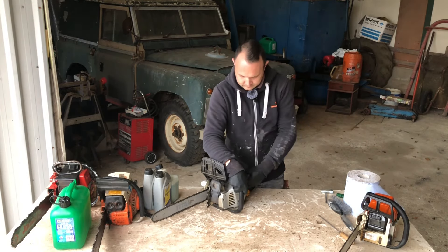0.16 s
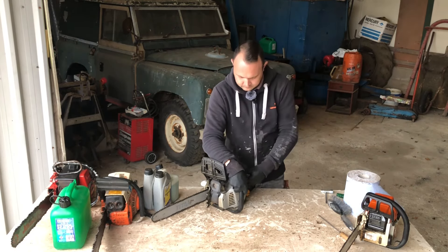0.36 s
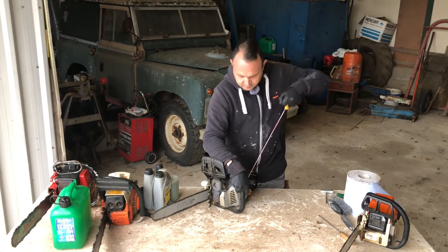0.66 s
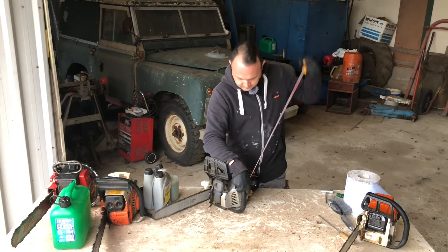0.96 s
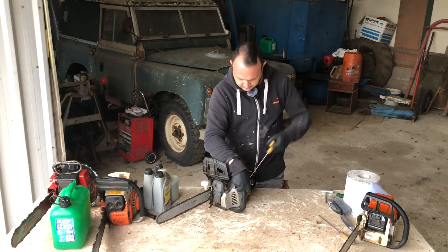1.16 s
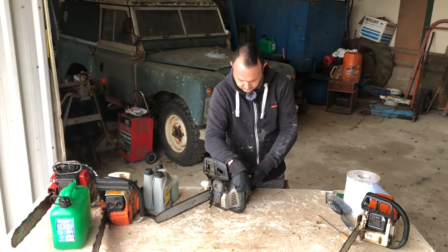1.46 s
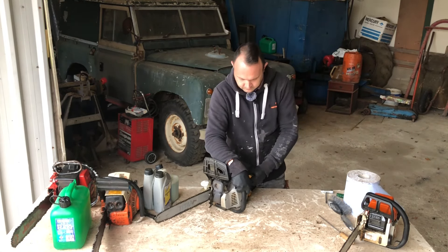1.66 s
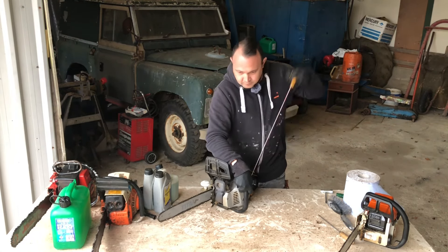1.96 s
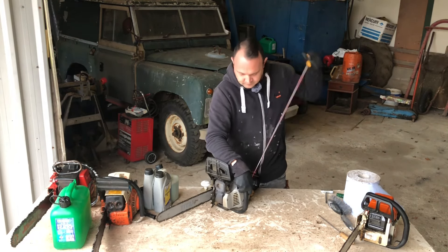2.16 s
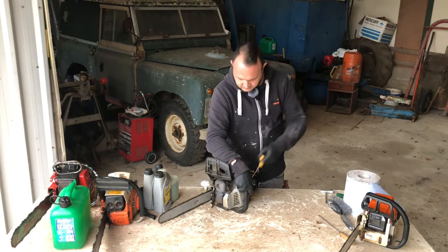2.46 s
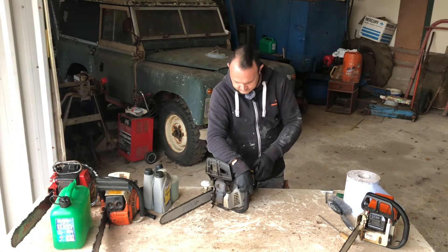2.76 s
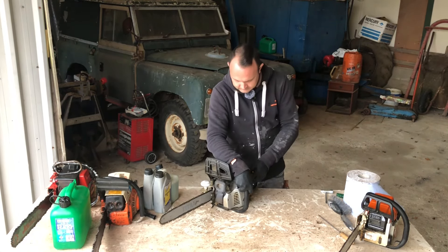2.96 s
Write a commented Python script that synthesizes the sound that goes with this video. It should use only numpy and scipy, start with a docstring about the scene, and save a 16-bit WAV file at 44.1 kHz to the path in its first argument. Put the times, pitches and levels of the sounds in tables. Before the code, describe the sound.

A small chainsaw's starter cord is pulled twice with rasping whirrs, but the cold engine never catches.

```python
"""A cold two-stroke chainsaw is pull-started on a wooden bench in a garage and does not catch: sparse random
impulses through bench resonances make the judder, low sine pushes the bumps, and filtered slips the cord's rasp.
Noise bursts make cord snaps, damped modes the ticking, clunking pawls, and ringing bands the chain's clash on its bar.
The spring then winds the cord back in noisy scrapes until the handle smacks the housing, all over room tone and hum.
The scene opens on the end of one rewind; two whole pulls follow."""
import sys
import numpy as np
from scipy import signal
from scipy.fft import rfft, irfft, next_fast_len
from scipy.io import wavfile
from scipy.ndimage import uniform_filter1d, map_coordinates

SR = 44100
rng = np.random.default_rng(int(sys.argv[2]) if len(sys.argv) > 2 else 0)


def materialize(psi):
    """Save the field psi as 16-bit PCM at rate SR to the path in sys.argv[1].

    A 1-D psi becomes a single channel; in a 2-D psi each row is a channel.
    """
    bounded = np.clip(np.atleast_2d(psi).T, -1, 1)
    quanta = np.round(bounded * 32767).astype(np.int16)
    wavfile.write(sys.argv[1], SR, quanta)


N = 136710

# Levels in the tables are relative: the sources add their own trims.
# judder of the cranking engine, one curve a pull: start_s, level_db
CRANK_CURVES = [
    [(0.64, -58), (0.718, -27.5), (0.78, -43.5), (0.822, -14), (1.086, -20), (1.4, -55)],
    [(1.88, -40.5), (1.978, -37), (2.004, -31.5), (2.066, -10), (2.202, -16), (2.62, -49)],
]
# running cord and pulley, one curve a run: start_s, whirr_db, rasp_db, hiss_db
CORD_CURVES = [
    [(0.0, -27.5, -36, -43.5), (0.048, -28, -44.5, -52), (0.056, -37, -44, -51), (0.068, -28.5, -41.5, -53),
     (0.078, -39.5, -45, -64), (0.125, -35.5, -47, -72.5)],
    [(0.67, -19, -81, -101.5), (0.774, -28, -41.5, -51.5), (0.834, -15.5, -35.5, -52.5),
     (1.092, -20, -33, -36.5), (1.328, -28, -46, -72), (1.41, -28.5, -42.5, -52)],
    [(1.91, -21.5, -38.5, -92.5), (2.022, -19.5, -49.5, -59.5), (2.058, -16, -41, -71),
     (2.194, -20, -34.5, -44), (2.588, -33.5, -44.5, -55.5), (2.64, -42.5, -48.5, -76)],
]
# the saw bumps the bench: start_s, level_db
BENCH_BUMPS = [(0.69, -17.5), (0.719, -10.5), (0.817, -1), (0.83, -3), (0.85, -1.5), (0.879, 5),
               (0.911, -5), (0.931, -14.5), (0.955, -5.5), (1.004, -12), (1.052, -2.5), (1.076, -7.5),
               (1.945, -5), (1.978, -5), (2.063, -13), (2.081, 0), (2.109, 0.5), (2.123, -2.5), (2.139, -5),
               (2.172, -0.5), (2.201, -17), (2.223, -3.5), (2.247, -11), (2.28, -11)]
# dry snaps of the cord under load: start_s, level_db, pitch_hz
CORD_SNAPS = [(0.6833, 0, 4000), (0.6908, -6, 4330), (0.7138, -7, 4450), (0.7161, -3.5, 6700),
              (0.7224, -0.5, 6900), (0.7273, -2, 4170), (0.8026, -4.5, 3870), (0.8227, -11, 6770),
              (0.8368, -11.5, 4290), (0.965, -3, 6560), (0.9815, -8.5, 6100), (1.898, -17.5, 4400),
              (1.9275, -1.5, 5050), (1.945, -2, 4080), (1.9771, -2.5, 6700), (1.9831, -3, 6900),
              (1.9858, -11, 4370), (2.0229, -10.5, 4430), (2.0674, -1, 6700), (2.1881, -7, 4450),
              (2.2076, -4.5, 3960), (2.2144, -0.5, 6800), (2.2304, -11, 4250), (2.2429, -3.5, 4420)]
# scrapes of the rewinding pulley: start_s, scrape_db, hiss_db
PULLEY_SCRAPES = [(0.017, -22.5, -35.5), (0.04, -10, -50), (0.065, -14.5, -37.5), (0.103, -17.5, -38.5),
                  (0.163, -16, -46.5), (1.04, -14, -44.5), (1.079, -10, -29.5), (1.105, -13.5, -29),
                  (1.185, -30, -34.5), (1.219, -11.5, -34), (1.241, -6, -35), (1.264, -10.5, -36),
                  (1.285, -23.5, -35), (1.311, -11.5, -39), (1.34, -14, -44), (1.374, -18, -51),
                  (2.289, -2.5, -32), (2.339, -7.5, -30.5), (2.349, -10.5, -45.5), (2.363, -15, -30.5),
                  (2.375, -8, -27.5), (2.4, -8, -35), (2.42, -10.5, -48), (2.458, -19.5, -41),
                  (2.501, -20.5, -71), (2.545, -16, -56), (2.572, -10, -53), (2.605, -12.5, -44.5),
                  (2.643, -12, -41)]
# the pawls flick out: start_s, level_db
PAWL_TICKS = [(0.612, -17), (1.849, -16)]
# the pawls seat and the starter knocks: start_s, level_db, hardness_db
PAWL_CLUNKS = [(0.636, -19, 11.5), (0.644, -21, 11), (0.753, -24, -9), (1.868, -9.5, -4.5),
               (1.882, -20.5, -4), (2.049, -10, -19.5)]
# the chain clashes on the bar: start_s, level_db, ring_db
CHAIN_CLASHES = [(0.881, -9.5, -16), (2.112, -12, -15.5)]
# the handle hits the housing, each spot with two rings: start_s, level_db, low_hz, low_db, high_hz, high_db
HANDLE_SMACKS = [(0.137, -8.5, 494.4, 2.5, 1153, -4), (1.430, -6, 513, -4, 814, 2.5),
                 (2.659, 11, 460.6, -0.5, 1034, 5.5)]
REBOUND_S, REBOUND_DB = 0.006, 2  # the second end of the handle lands later and louder

# damped modes, before any event envelope: pitch_hz, level_db, t60_s
HOUSING_MODES = [(454, -24.5, 0.36), (824, -10.5, 0.056), (1007, -24, 0.31), (1230, -15.5, 0.06),
                 (1428, -11, 0.04), (1920, -14, 0.015)]
PAWL_MODES = [(1680, -1.5, 0.0099), (1880, 4, 0.0099), (4070, -2, 0.014), (4050, 3, 0.021),
              (4740, -1, .009), (5200, -10.5, .008), (7100, -26.5, .04), (10880, -10, 0.0089)]
STARTER_MODES = [(550, 2, 0.089), (450, -9.5, 0.03), (684, -10.5, 0.076), (994, -9.5, 0.076),
                 (2370, -20.5, .06), (3230, -22.5, 0.13)]

# resonances of chain, bench, plastic shell and pulley: centre_hz, width_hz, level_db
CHAIN_BODY = [(2935, 43, 6.5), (4280, 260, -6), (5170, 130, -6), (5640, 150, -6.5), (6700, 210, 0),
              (7100, 400, -11), (8300, 300, -10.5), (13700, 670, -18)]
BENCH_BODY = [(32, 28, -3), (63, 22, -4.5), (129, 34, 3.5), (239, 88, -2.5), (314.6, 58, -2.5)]
SHELL_BODY = [(439, 49, 6), (554.5, 40, 8.5), (782, 130, 0.5), (969, 82, 3.5), (1180, 290, -3),
              (1546, 330, -5), (2500, 580, -13)]
PULLEY_BODY = [(3100, 200, -2), (3840, 170, 0.86), (6340, 210, 0), (7400, 460, -3.2)]

# noise colours of the sources and the room tone: frequency_hz, relative_db
RASP_COLOUR = [(900, -17.5), (1800, -43.5), (2500, 4.5), (3150, 10), (4000, 5.5), (4700, 0.5), (6700, 2.5),
               (8000, -15.5), (10000, -20), (15000, -47)]
HISS_COLOUR = [(3000, -20.5), (6000, -5.5), (8600, -1), (9800, -6), (12000, -1.5), (14000, 1.5),
               (15800, -5)]
SNAP_COLOUR = [(100, 7), (900, -6), (2100, 8), (3000, -6.5), (4300, 3.5), (5600, -9.5), (7000, 0),
               (7800, -5), (8600, 5), (9700, -7), (14500, -8), (16000, -22.5)]
SCRAPE_COLOUR = [(200, -6.5), (380, -7.5), (520, 9), (680, 3.5), (1000, 5), (1900, -13), (3000, -10),
                 (4000, -23.5), (4800, -24.5), (7000, -25), (10000, -44.5)]
SMACK_COLOUR = [(60, -40.5), (250, -8.5), (400, -3.5), (520, 1), (660, 5.5), (1000, 8), (1500, -4.5),
                (3600, -11), (5500, -20.5), (9000, -28), (14000, -34), (16000, -42.5)]
CLASH_COLOUR = [(500, -16), (2000, -11.5), (3200, 3.5), (5000, 1), (6500, 2), (8500, -9.5), (10000, -20),
                (14000, -7), (16000, -22.5)]
AIR_COLOUR = [(25, -1), (60, -5.5), (90, -1), (140, -4), (220, -15.5), (550, -16.5), (1500, -34),
              (2800, -32), (5000, -39.5), (16000, -48)]
KNOCK_COLOUR = [(25, -7.5), (250, 4.0), (550, 3.0), (700, -10), (1100, -2.5), (2500, -47.5), (8000, -73.0)]
CLICK_COLOUR = [(1000, -27.5), (1850, 7), (2900, -20), (4100, 4.0), (5100, 0.5), (6000, -23), (14000, -22.5)]
RATTLE_COLOUR = [(200, -25.5), (600, 4.0), (2200, -7.5), (3200, 4.5), (4200, -2.5), (5200, -15.0),
                 (10000, -24.5), (14000, -12.0)]
THUNK_COLOUR = [(100, -33), (330, -7), (530, 8), (750, -6.5), (1100, -6), (2500, -38)]

# decay of the garage: frequency_hz, t60_s
ROOM_DECAY = [(100, 1.04), (450, 0.24), (1200, 0.4267), (3300, 0.3548), (4800, 0.24), (7000, 0.33),
              (10000, 0.14), (15000, 0.2)]
# strength of the garage's answer: frequency_hz, relative_db
ROOM_STRENGTH = [(60, -14.5), (250, -16), (350, -12), (450, -13), (600, -9.5), (1000, -12), (1500, -9.5),
                 (2400, -11), (3400, -5.5), (4800, -9), (7000, -10), (14000, -13)]
# a faint hum in the garage: start_s, level_db
HUM_CURVE = [(0, -56), (0.55, -56.5), (0.7, -62.5), (1.7, -65), (3.1, -65.5)]
HUM_HZ = 65

LIMIT_DB, RELEASE_DB_PER_S = -1.5, 55.5
TOP_HZ = 15900  # upper edge of the band


def amp(db):
    """Decibels to gain."""
    return 10 ** (np.asarray(db) / 20)


def unit(x):
    """Scale to rms 1."""
    return x / np.sqrt(np.mean(x ** 2) + 1e-20)


def along(points, hz):
    """Read a (frequency_hz, value) curve on a log frequency axis."""
    f, v = np.transpose(points)
    return np.interp(np.log(hz + 1), np.log(f + 1), v)


def filtered(x, response):
    """x times a response of frequency."""
    m = next_fast_len(len(x) + SR // 4)
    hz = np.fft.rfftfreq(m, 1 / SR)
    return irfft(rfft(x, m) * response(hz), m)[:len(x)]


def coloured(x, spectrum):
    """x through a spectrum, at rms 1."""
    return unit(filtered(x, lambda hz: amp(along(spectrum, hz))))


def resonate(x, body):
    """x through a body's resonances, with alternating signs, at rms 1."""
    def response(f):
        total = 0
        for k, (centre, width, db) in enumerate(body):
            band = 1j * f * width / (centre * centre - f * f + 1j * f * width)
            total = total + (-1) ** k * amp(db) * band
        return total
    return unit(filtered(x, response))


def age():
    """Seconds since an event began, for half a second."""
    return np.arange(SR // 2) / SR


def envelope(attack, hold, t60):
    """Exponential rise, then a decay that starts after the hold; all in seconds."""
    decay = amp(-60 * np.maximum(age() - hold, 0) / t60)
    return (1 - np.exp(-age() / attack)) * decay


def grains(rate, size):
    """Random impulses, on average rate a second."""
    return (rng.random(size) < rate / SR) * rng.standard_normal(size)


def noise(spectrum):
    """Coloured noise for one event."""
    return coloured(rng.standard_normal(SR // 2), spectrum)


def wobble(rate, size):
    """A smooth random curve, rate knots a second."""
    knots = rng.standard_normal(size // 4)
    return map_coordinates(knots, [np.arange(size) * rate / SR], mode="wrap")


def ring(modes, rough):
    """Damped modes with levels and phase wobble (rough, radians) that differ at each blow."""
    t = age()
    out = np.zeros(len(t))
    for hz, db, t60 in modes:
        gain = amp(db + rng.normal(0, 1) - 60 * t / t60)
        out += gain * np.sin(2 * np.pi * hz * t + rough * wobble(210, size=len(t)))
    return out


def add(out, s, x):
    """Mix x into out at time s."""
    i = max(round(s * SR), 0)
    out[i:i + len(x)] += x[:len(out) - i]


def level(tables, order, edge_s):
    """Gain from one column of the curves, fading to silence between runs."""
    t = np.arange(N) / SR
    out = np.zeros(N)
    for run in map(np.array, tables):
        inside_s = np.minimum(t - run[0, 0], run[-1, 0] - t)  # negative outside the run
        fade = np.clip(1 + inside_s / edge_s, 0, 1)
        out += amp(np.interp(t, run[:, 0], run[:, order])) * fade
    return out


def patchy(x, depth_db):
    """x with its colour shifting at random from moment to moment, at rms 1."""
    z = signal.stft(x, nperseg=256)[2]
    field = uniform_filter1d(rng.standard_normal(z.shape), size=5, axis=0)  # smooth over frequency
    field = uniform_filter1d(field, size=6, axis=1)  # smooth over time
    return unit(signal.istft(z * amp(depth_db * unit(field)), nperseg=256)[1][:len(x)])


def still_air(air_db=-61):
    """Steady coloured noise as room tone, with a low sine hum."""
    t = np.arange(N) / SR
    hum = amp(np.interp(t, *np.transpose(HUM_CURVE))) * np.sin(2 * np.pi * HUM_HZ * t)
    return hum + amp(air_db) * coloured(rng.standard_normal(N), AIR_COLOUR)


def garage(x):
    """The diffuse answer of the garage: a noise tail whose bands each die at their own rate."""
    hz, t, z = signal.stft(rng.standard_normal(SR), SR, nperseg=256)
    t60 = along(ROOM_DECAY, hz)[:, None]
    decay = amp(along(ROOM_STRENGTH, hz)[:, None] - 60 * t / t60)
    even_energy = np.sqrt(2 * np.log(1000) / (t60 * SR))  # long decays are no stronger overall
    tail = signal.istft(z * decay * even_energy, SR, nperseg=256)[1]
    tail = np.pad(tail, (SR // 200, 0))  # 5 ms before the first answer
    return signal.fftconvolve(x, tail)[:N]


def handle(crack_db=-5, modes_db=-4, bass_cut_hz=260):
    """The handle strikes the housing with one end, then the other; the blows carry little bass."""
    out = np.zeros(N)
    contact_s, rough = .0006, .35
    for s, db, low_hz, low_db, high_hz, high_db in HANDLE_SMACKS:
        for delay, end_db in [(0, 0), (REBOUND_S, REBOUND_DB)]:
            crack = noise(SMACK_COLOUR) * envelope(contact_s, 0.0027, .022)
            add(out, s + delay, amp(db + end_db + crack_db) * crack)
        spot = [(low_hz, low_db, .08), (high_hz, high_db, .05)]
        modes = ring(HOUSING_MODES, rough) + ring(spot, rough)
        add(out, s, amp(db + modes_db) * modes * (1 - np.exp(-age() / contact_s)))
    highpass = signal.butter(4, bass_cut_hz, "high", fs=SR, output="sos")
    return signal.sosfilt(highpass, out)


def rewind(scrape_db=-11, hiss_db=-1, grit_db=0.5, colour_db=3, zing_db=-24):
    """The pulley scrapes its housing grittily, each time at another spot, as the spring winds the cord in."""
    out = np.zeros(N)
    for s, db, treble_db in PULLEY_SCRAPES:
        grit = unit(amp(grit_db * wobble(320, size=SR // 2)))
        spot = [(hz, band_db + colour_db * rng.standard_normal()) for hz, band_db in SCRAPE_COLOUR]
        scrape = amp(db + scrape_db) * noise(spot) * envelope(0.00029, 0.00093, 0.077)
        hiss = amp(treble_db + hiss_db) * patchy(noise(HISS_COLOUR), depth_db=3.5)
        zing = amp(db + zing_db) * resonate(rng.standard_normal(SR // 2), PULLEY_BODY)
        add(out, s, grit * (scrape + (hiss + zing) * envelope(0.0043, 0.0046, 0.083)))
    return out


def chain(jingle_db=-6):
    """At the height of the pull the steel chain clashes and its many links jingle."""
    out = np.zeros(N)
    for s, db, ring_db in CHAIN_CLASHES:
        links = resonate(grains(3100, size=SR // 2), CHAIN_BODY)
        clash = amp(db) * noise(CLASH_COLOUR) * envelope(0.0037, 0.0084, 0.046)
        jingle = amp(ring_db + jingle_db) * links * envelope(.002, 0.023, 0.38)
        add(out, s, clash + jingle)
    return out


def pawls(click_db=-2, thunk_db=-7):
    """The pawls flick out with a tick and seat on the flywheel with a clunk, both ringing metal modes."""
    ticks, clunks = np.zeros(N), np.zeros(N)
    rise_s = .0012
    for s, db in PAWL_TICKS:
        metal = ring(PAWL_MODES, rough=0.54) * envelope(rise_s, .003, .04)
        click = noise(CLICK_COLOUR) * envelope(rise_s, 0.0022, 0.014)
        add(ticks, s, amp(db + click_db) * (metal + amp(-9) * click))
    for s, db, hard_db in PAWL_CLUNKS:
        rattle = noise(RATTLE_COLOUR) * envelope(0.00054, 0.0027, 0.077)
        thunk = noise(THUNK_COLOUR) * envelope(rise_s, 0.004, 0.053)
        metal = ring(STARTER_MODES, rough=0.6) * envelope(rise_s, 0.022, .4)
        clunk = metal + amp(thunk_db) * thunk + amp(hard_db - 13.0) * rattle
        add(clunks, s, amp(db) * clunk)
    return ticks, clunks


def snaps(snap_db=-8, bite_db=1, creak_db=-15):
    """Each snap is a sharp crack with a bite at its own pitch, amid a short creak of fibres."""
    out = np.zeros(N)
    lead_s = .003  # the creak starts ahead of the crack
    for s, db, hz in CORD_SNAPS:
        bite = resonate(rng.standard_normal(SR // 2), [(hz, 380, 0)])
        crack = noise(SNAP_COLOUR) + amp(bite_db) * bite
        add(out, s, amp(db + snap_db) * crack * envelope(0.00095, 0.0014, 0.013))
        creak = coloured(grains(4100, size=SR // 2), SNAP_COLOUR) * envelope(0.00021, 0.011, 0.0043)
        add(out, s - lead_s, amp(db + snap_db + creak_db) * creak)
    return out


def cord(whirr_db=-4, rasp_db=0, hiss_db=-1, flutter_db=3.0):
    """The braid rubs through its guide in tiny slips that sound the plastic shell."""
    flutter = unit(amp(flutter_db * wobble(75, size=N)))
    whirr_level, rasp_level, hiss_level = [level(CORD_CURVES, order=k, edge_s=0.056) for k in (1, 2, 3)]
    slips = grains(740, size=N)
    whirr = amp(whirr_db) * whirr_level * resonate(slips, SHELL_BODY)
    rub = coloured(slips + amp(12.5) * grains(4000, size=N), RASP_COLOUR)
    rasp = amp(rasp_db) * rasp_level * patchy(rub, depth_db=2)
    fine_rub = coloured(grains(7700, size=N), HISS_COLOUR)
    hiss = amp(hiss_db) * hiss_level * patchy(fine_rub, depth_db=1.5)
    return flutter * (whirr + rasp + hiss)


def cranking(judder_db=-2, bump_db=-4, push_hz=140):
    """The turning engine shakes the bench's resonances and now and then bumps it."""
    judder = resonate(grains(900, size=N), BENCH_BODY)
    out = amp(judder_db) * level(CRANK_CURVES, order=1, edge_s=0.003) * judder
    for s, db in BENCH_BUMPS:
        hz = push_hz * np.exp(rng.normal(0, 0.035))  # each bump slightly off pitch
        push = np.sin(2 * np.pi * hz * age()) * envelope(0.0028, 0.00053, 0.022)
        knock = noise(KNOCK_COLOUR) * envelope(0.00048, 0.0023, 0.055)
        add(out, s, amp(db + bump_db) * (push + amp(-7.0) * knock))
    return out


def scene(snap_room_db=-13, saw_room_db=-3, handle_room_db=-2):
    """The saw, the room's answer and the still air."""
    ticks, clunks = pawls()
    sharp = snaps() + ticks
    smack = handle()
    saw = cranking() + cord() + chain() + rewind() + clunks
    room = garage(amp(saw_room_db) * saw + amp(snap_room_db) * sharp + amp(handle_room_db) * smack)
    return (saw + sharp + smack + room + still_air())[None]


def record(dry):
    """A look-ahead limiter ducks the loudest blows and recovers slowly; peaks round off, then the top is cut."""
    x = dry[0]
    power = np.abs(uniform_filter1d(x ** 2, size=330))
    over_db = np.maximum(10 * np.log10(power + 1e-12) - LIMIT_DB, 0)
    recovery = RELEASE_DB_PER_S * np.arange(N) / SR
    gain_db = recovery - np.maximum.accumulate(over_db + recovery)  # instant duck, steady release
    x = x * amp(uniform_filter1d(gain_db, size=130))
    clipped = x / (1 + np.abs(x / .87) ** 6) ** (1 / 6)
    # the rounding acts above 200 Hz and spares the bass
    x = x + filtered(clipped - x, lambda f: 1 - 1 / (1 + (f / 200) ** 6))
    return filtered(x, lambda f: 1 / (1 + (f / TOP_HZ) ** 160))[None]


dry = scene()
out = record(dry)
materialize(out)
```